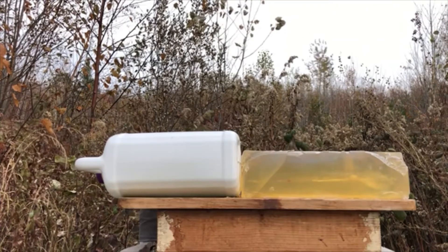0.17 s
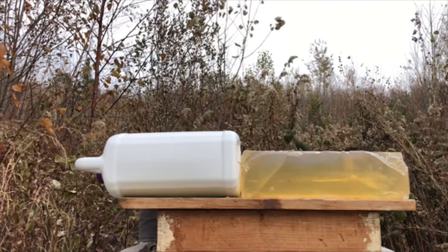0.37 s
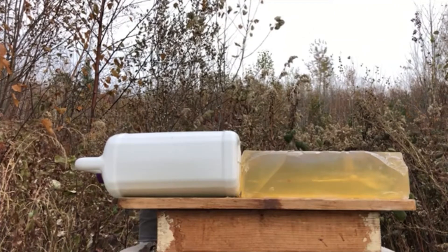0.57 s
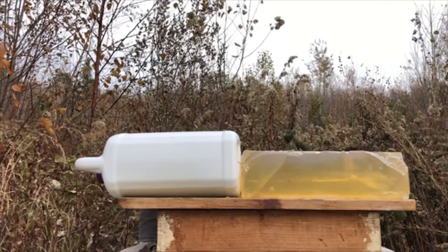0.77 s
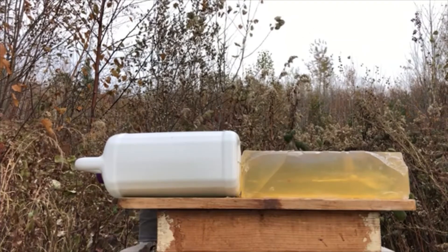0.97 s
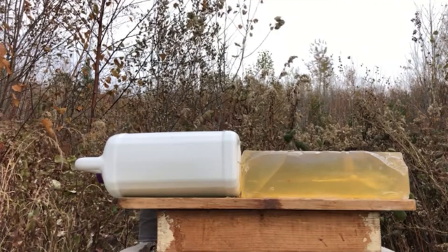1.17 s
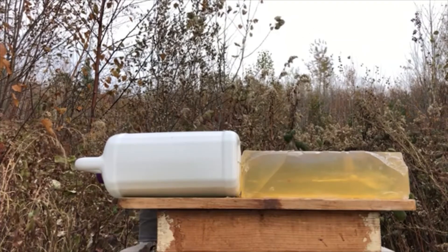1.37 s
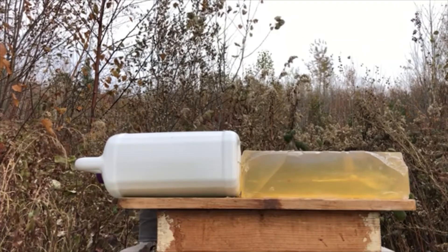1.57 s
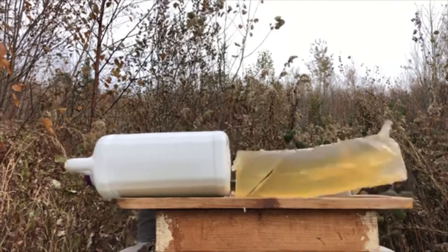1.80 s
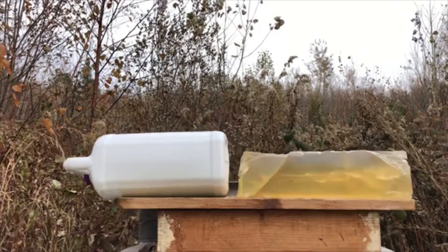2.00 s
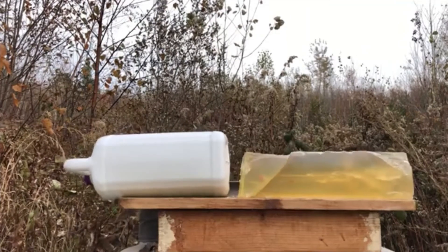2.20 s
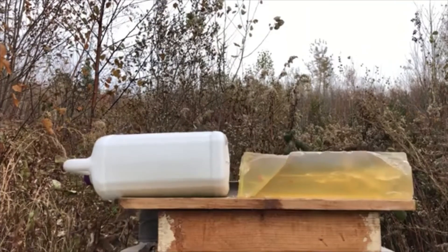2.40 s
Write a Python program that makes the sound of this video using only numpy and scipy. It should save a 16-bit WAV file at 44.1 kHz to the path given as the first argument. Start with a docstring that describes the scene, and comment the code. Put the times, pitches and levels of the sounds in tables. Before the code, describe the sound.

A single pistol shot after quiet outdoor air, heard close to the target: sharp crack, hard slap into a plastic bottle and gelatin block, muzzle blast, quick tree echoes, then a dull flop and small wet ticks.

```python
"""Quiet outdoor air, a faint whine and drone and one dry tick; then a single pistol shot, heard near its target.
Filtered noise makes the air, and wavering sines make the whine and drone.
Short noise bursts make the bullet's crack, its slap into a bottle and a gelatin block, and the muzzle blast.
Fading sines add a short, rough ring; noise that dies at its own speed in each band makes the woods' answer.
More noise bursts make the block heave, flop back on the bench with a thud and settle with small wet ticks."""
import sys
import numpy as np
from scipy import signal
from scipy.fft import rfft, irfft, next_fast_len
from scipy.io import wavfile
from scipy.ndimage import map_coordinates

SR = 44100
rng = np.random.default_rng(int(sys.argv[2]) if len(sys.argv) > 2 else 0)


def inscribe(sig):
    """Save sig as 16-bit PCM at rate SR to the path in sys.argv[1].

    A 1-D sig is mono; a 2-D sig holds one channel per row.
    Samples are clipped to [-1, 1] before scaling.
    """
    pcm = np.round(np.clip(np.atleast_2d(sig).T, -1, 1) * 32767)
    wavfile.write(sys.argv[1], SR, pcm.astype(np.int16))


N = 107868  # length in samples

# Colour tables give only the balance between pitches: noise() evens out their loudness.
# t60 is the time a sound takes to fall by 60 dB.

# Quiet outdoor air: (frequency [Hz], relative level [dB])
AIR_COLOUR = [(15, -35.5), (25, -17), (50, -3), (75, -2), (120, -11), (243, -10), (394, -12), (729, -12.5),
              (1120, -15), (1400, -18.5), (2240, -25), (4500, -24), (6500, -26), (9000, -33),
              (15000, -38.5)]
AIR_DB, AIR_FALL_DB_PER_S, AIR_WOBBLE_DB = -62.5, 2.5, 0.52
# Loudness of the distant whine: (time [s], level [dB])
WHINE_LEVEL = [(0, -72), (.07, -67.5), (.17, -77), (.23, -73.5), (.35, -80.5), (1.0, -85.5), (1.17, -72),
               (1.5, -70), (1.62, -72), (1.8, -80)]
WHINE_HZ, WHINE_DRIFT_HZ = 1237, 1.9
DRONE_HZ, DRONE_DRIFT_HZ = 722, 12
DRONE_DB, DRONE_FALL_DB_PER_S, DRONE_WOBBLE_DB = -72.5, 9.5, 3
# A dry stalk ticks: (start [s], level [dB], attack [s], hold [s], t60 [s])
RUSTLE = (.261, -61, .002, .003, .03)
# Colour of that tick: (frequency [Hz], relative level [dB])
RUSTLE_COLOUR = [(1500, -30), (2800, -10), (3700, 2), (4800, -8), (8000, -25)]

# All levels from here to the wet ticks are before this shared lift.
SHOT_LIFT_DB = 11
# Bullet crack, slap and muzzle blast, each: (start [s], level [dB], attack [s], hold [s], t60 [s])
CRACK = (1.6028, -25.5, 0.01, 0.0116, 0.04)
SLAP = (1.6085, -8.3, .009, .0085, .042)
BLAST = (1.6256, -10.3, .0005, .006, .01)
# Their colours, each: (frequency [Hz], relative level [dB])
CRACK_COLOUR = [(100, -15), (450, 1), (1000, -1), (1600, 0), (2100, -16), (3000, -10), (6000, -11.5),
                (14000, -17.5)]
SLAP_COLOUR = [(40, -23.5), (140, -27), (210, -17.5), (310, -19.5), (470, -0.5), (620, -5.5), (720, 2),
               (810, 5.5), (1000, -8.5), (1520, -1.5), (1850, -18), (2150, -9.5), (2550, -19.5),
               (2950, -10), (3400, -37.5), (7000, -47), (12000, -48.5)]
BLAST_COLOUR = [(200, -16), (450, -1), (700, 2), (1100, -2), (1500, -1.5), (2200, -8.5), (3200, -4.5),
                (4200, 1.5), (6200, -1), (11000, -1), (15000, -7)]

# Low heaves of the block: (start [s], level [dB], attack [s], hold [s], t60 [s])
HEAVES = [(1.614, -34, .01, .01, .05), (1.654, -34.5, .008, 0.016, .06)]
# Colour of the heaves: (frequency [Hz], relative level [dB])
HEAVE_COLOUR = [(20, -7.5), (45, -0.5), (90, -1), (140, -9.5), (300, -24.5), (1000, -62.5)]

# Short, rough ringing tones right after the hit: (frequency [Hz], level [dB], t60 [s])
RING_MODES = [(210, -23, .16), (415, -21, .16), (497, -17.5, .15), (580, -20.5, .15), (1158, -17.5, .115),
              (1222, -19.5, .11), (1362, -21, .12), (1642, -15, .115), (3202, -21, .125), (3700, -21, .125),
              (5400, -22, .125), (6140, -20.5, .115)]
RING_S, RING_ATTACK_S, RING_ROUGH_RAD = 1.622, 0.005, 0.3

# Scatter from the near trees: (frequency [Hz], relative level [dB])
WOODS_COLOUR = [(40, -21.5), (120, -22.5), (360, -24.5), (580, -6), (900, 0), (1200, -4), (1600, -11.5),
                (2100, -7.5), (2700, -13), (6000, -13.5), (10000, -22), (15000, -31)]
# How fast each pitch of it dies: (frequency [Hz], t60 [s])
WOODS_T60 = [(60, 0.36), (400, 0.74), (900, 0.62), (2500, 0.56), (6000, .41), (10000, .3), (14000, .22)]
WOODS_S, WOODS_PEAK_S, WOODS_FADE_IN_S = 1.643, 1.723, 0.015
WOODS_DB, WOODS_RISE_DB, WOODS_GRAIN_DB = -22, 2.5, 1.5
# Returns from lines of trees: (start [s], level [dB], attack [s], hold [s], t60 [s])
ECHOES = [(1.677, -24.5, 0.0042, 0.007, 0.07), (1.716, -23.5, 0.0075, 0.023, 0.16),
          (1.864, -37, 0.01, 0.02, .12)]
# Colour of these returns: (frequency [Hz], relative level [dB])
ECHO_COLOUR = [(300, -33), (520, -4.5), (880, 1.5), (1200, -4.5), (1600, -15.5), (3000, -22), (8000, -43)]

# The far forest: (frequency [Hz], relative level [dB])
FAR_COLOUR = [(50, -35), (260, -23.5), (380, -8.5), (850, 0), (1300, -8.5), (2200, -11.5), (4200, -19),
              (7000, -32.5), (15000, -49)]
# How fast each pitch of it dies: (frequency [Hz], t60 [s])
FAR_T60 = [(100, 1.5), (400, 2.5), (850, 4.36), (2000, 2.46), (4000, 1.68), (8000, 1.7)]
FAR_S, FAR_PEAK_S, FAR_DB, FAR_WOBBLE_DB = 1.84, 1.91, -49.5, 2

# The block flops on the bench: (start [s], level [dB], t60 [s])
LANDINGS = [(1.857, -42, 0.11), (1.965, -54.5, 0.19), (2.283, -59.5, 0.13)]
# Colour of the flops: (frequency [Hz], relative level [dB])
LANDING_COLOUR = [(40, -23), (90, -10), (160, -4.5), (250, -11), (380, 4), (550, -1.5), (1000, -15),
                  (3000, -18), (10000, -39)]
LANDING_ATTACK_S, LANDING_HOLD_S = 0.0096, 0.016
# Wet ticks of the settling block: (start [s], level [dB], t60 [s])
TICKS = [(1.857, -51, .025), (1.97, -52.5, 0.025), (2.019, -65, .04), (2.124, -66, .03),
         (2.137, -67, 0.028), (2.185, -60.5, 0.044), (2.212, -62, 0.07), (2.232, -62.5, 0.14),
         (2.311, -68.5, 0.11), (2.438, -63, .05)]
# Colour of the ticks: (frequency [Hz], relative level [dB])
TICK_COLOUR = [(500, -9), (3000, 0.5), (7500, 0), (14000, -6.5)]
TICK_ATTACK_S = 0.001

# Automatic gain control, peak rounding and top cut
DUCK_THRESHOLD_DB, DUCK_MAX_DB, DUCK_RELEASE_S = -28, 11, 6.5
CEILING, TOP_HZ = 0.92, 15200


def amp(db):
    """Turn decibels into a gain."""
    return 10 ** (np.asarray(db) / 20)


def unit(x):
    """Scale a sound to an rms (average strength) of 1."""
    return x / np.sqrt(np.mean(x ** 2) + 1e-20)


def clock():
    """Give the time of each sample in seconds."""
    return np.arange(N) / SR


def along(points, hz):
    """Read a (frequency, value) table between its points, on a log frequency axis."""
    table_hz, values = np.transpose(points)
    return np.interp(np.log(hz + 1), np.log(table_hz + 1), values)


def wobble(rate):
    """Draw a smooth random curve around zero through `rate` random points a second."""
    return map_coordinates(rng.standard_normal(1024), [clock() * rate], mode="wrap")


def filtered(x, response):
    """Multiply each frequency of a sound by a gain."""
    length = next_fast_len(N + SR // 2)  # spare room at the end
    spectrum = rfft(x, length) * response(np.fft.rfftfreq(length, 1 / SR))
    return irfft(spectrum, length)[:N]


def noise(colour):
    """Make steady noise with the given colour and an rms of 1."""
    return unit(filtered(rng.standard_normal(N), lambda hz: amp(along(colour, hz))))


def envelope(start, attack, hold, t60):
    """Shape loudness: a curved rise, a hold, then an exponential fade."""
    t = clock() - start
    rise = np.clip(t / attack, 0, 1) ** 2
    return rise * amp(-60 * np.maximum(t - attack - hold, 0) / t60)


def burst(colour, start, db, attack, hold, t60):
    """Make a puff of coloured noise whose held part has the given level."""
    shape = envelope(start, attack, hold, t60)
    puff = noise(colour) * shape
    # Even out the luck of the draw, so that each puff has the energy its shape calls for.
    return amp(db) * puff * np.linalg.norm(shape) / np.linalg.norm(puff)


def tone(hz, drift_hz, rate):
    """Make a sine of rms 1 whose pitch wavers."""
    cycles = np.cumsum(hz + drift_hz * wobble(rate)) / SR
    return unit(np.sin(2 * np.pi * cycles))


def dying(x, start, t60s):
    """From the start time, fade each frequency at its own speed."""
    hz, t, bands = signal.stft(x, SR, nperseg=256)
    fade_db = -60 * np.maximum(t - start, 0) / along(t60s, hz)[:, None]
    return signal.istft(bands * amp(fade_db), SR, nperseg=256)[1][:N]


def air():
    """Quiet outdoor air: soft noise that slowly sinks and wavers a little."""
    level_db = AIR_DB - AIR_FALL_DB_PER_S * clock() + AIR_WOBBLE_DB * wobble(8)
    return amp(level_db) * noise(AIR_COLOUR)


def whine():
    """A faint distant whine: one nearly steady sine that swells and sinks."""
    level_db = np.interp(clock(), *np.transpose(WHINE_LEVEL))
    return amp(level_db) * tone(WHINE_HZ, WHINE_DRIFT_HZ, rate=25)


def drone():
    """A faint drone: a lower, more unsteady sine that fades away."""
    level_db = DRONE_DB - DRONE_FALL_DB_PER_S * clock() + DRONE_WOBBLE_DB * wobble(5)
    return amp(level_db) * tone(DRONE_HZ, DRONE_DRIFT_HZ, rate=59)


def rustle():
    """A dry stalk in the weeds ticks once: a tiny burst of bright noise."""
    return burst(RUSTLE_COLOUR, *RUSTLE)


def shot():
    """The bullet's crack, its slap into the block, then the slower muzzle blast, each a noise burst."""
    crack = burst(CRACK_COLOUR, *CRACK)
    slap = burst(SLAP_COLOUR, *SLAP)
    blast = burst(BLAST_COLOUR, *BLAST)
    return crack + slap + blast


def heaves():
    """The gelatin swells and collapses: two low bursts of noise."""
    return sum(burst(HEAVE_COLOUR, *row) for row in HEAVES)


def ring():
    """Rough tones ring after the hit: fading sines, roughened by shaking their phase."""
    t = clock() - RING_S
    total = np.zeros(N)
    for hz, db, t60 in RING_MODES:
        phase = 2 * np.pi * (hz * t + rng.random()) + RING_ROUGH_RAD * wobble(150)
        total += amp(db) * envelope(RING_S, RING_ATTACK_S, 0, t60) * np.sin(phase)
    return total


def near_woods():
    """Scatter from near trunks thickens as grainy noise, then dies band by band."""
    t = clock()
    scatter = unit(noise(WOODS_COLOUR) * amp(WOODS_GRAIN_DB * wobble(400)))
    swell_db = np.interp(t, [WOODS_S, WOODS_PEAK_S], [WOODS_DB - WOODS_RISE_DB, WOODS_DB])
    fade_in = np.clip((t - WOODS_S) / WOODS_FADE_IN_S, 0, 1)
    return dying(scatter, WOODS_PEAK_S, WOODS_T60) * amp(swell_db) * fade_in


def echoes():
    """Lines of trees send back separate echoes, each a noise burst."""
    return sum(burst(ECHO_COLOUR, *row) for row in ECHOES)


def far_roll():
    """The uneven loudness of the far forest, which fades in after the near woods."""
    fade_in = np.interp(clock(), [FAR_S, FAR_PEAK_S], [0, 1])
    return amp(FAR_DB + FAR_WOBBLE_DB * wobble(25.09)) * fade_in


def far_wash():
    """The wash of the far forest: noise whose bands each fade at their own speed."""
    return dying(noise(FAR_COLOUR), FAR_PEAK_S, FAR_T60)


def woods():
    """The woods answer: near scatter, separate echoes and the rolling far forest."""
    near = near_woods()
    roll = far_roll()
    returns = echoes()
    return near + returns + roll * far_wash()


def flops():
    """The block flops back on the bench: dull bursts of noise."""
    return sum(burst(LANDING_COLOUR, start, db, LANDING_ATTACK_S, LANDING_HOLD_S, t60)
               for start, db, t60 in LANDINGS)


def wet_ticks():
    """The gelatin settles: small, bright noise bursts with a sudden start."""
    return sum(burst(TICK_COLOUR, start, db, TICK_ATTACK_S, 0, t60) for start, db, t60 in TICKS)


def scene():
    """Add up everything that reaches the microphone, as one channel."""
    struck = shot() + ring() + heaves() + flops() + wet_ticks()
    loud = amp(SHOT_LIFT_DB) * (struck + woods())
    background = air() + whine() + drone() + rustle()
    return (loud + background)[None]


def record(dry):
    """Gain control ducks on a loud sound and recovers slowly; peaks are rounded; the top is cut off."""
    x, t = dry[0], clock()
    level_db = 20 * np.log10(np.abs(x) + 1e-9)
    over_db = np.clip(level_db - DUCK_THRESHOLD_DB, 0, DUCK_MAX_DB)
    recovery = np.exp(-t / DUCK_RELEASE_S)
    # Keep the strongest duck so far, shrinking as time passes.
    duck_db = np.maximum.accumulate(over_db / recovery) * recovery
    x = x * amp(-duck_db)
    x = x / (1 + np.abs(x / CEILING) ** 6) ** (1 / 6)
    return filtered(x, lambda hz: 1 / (1 + (hz / TOP_HZ) ** 100))[None]


dry = scene()
out = record(dry)
inscribe(out)
```